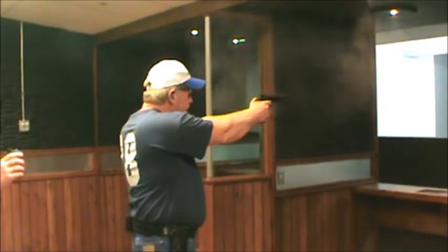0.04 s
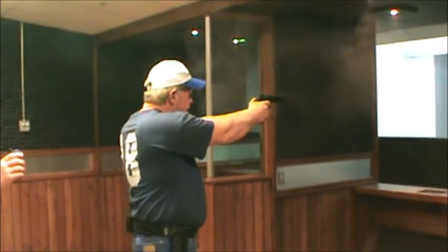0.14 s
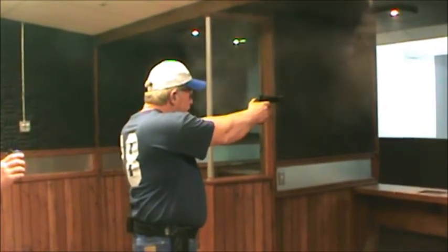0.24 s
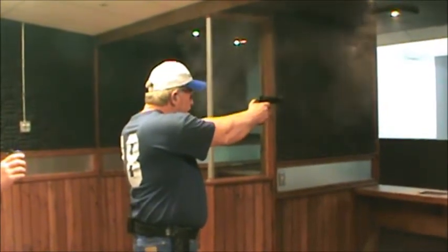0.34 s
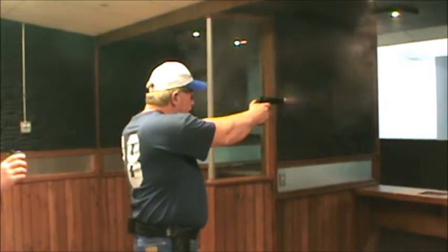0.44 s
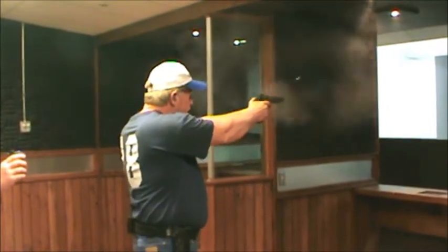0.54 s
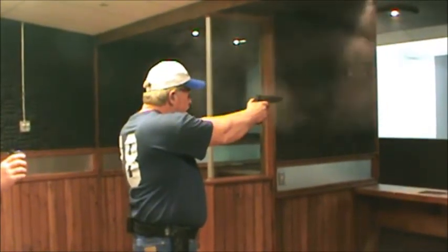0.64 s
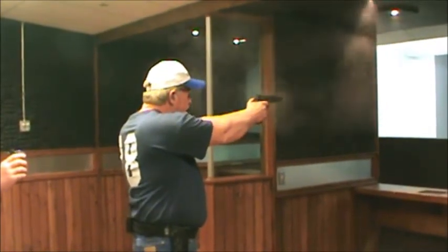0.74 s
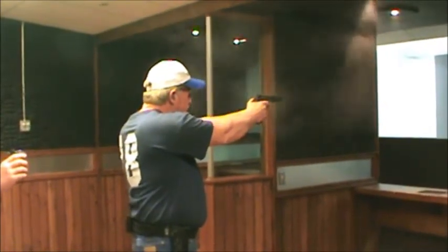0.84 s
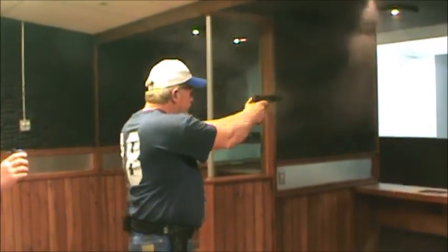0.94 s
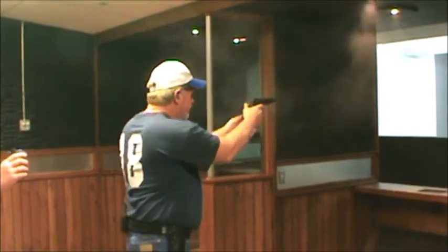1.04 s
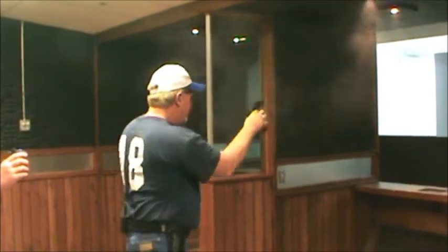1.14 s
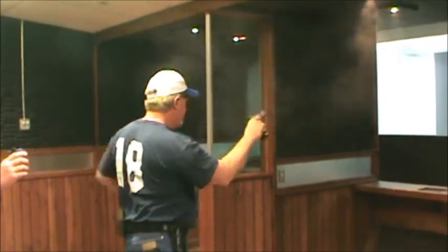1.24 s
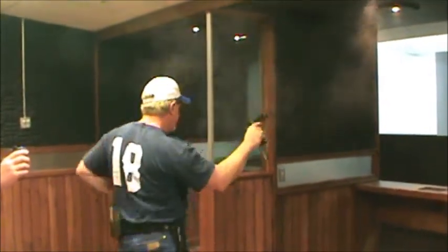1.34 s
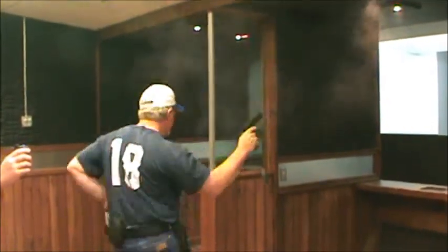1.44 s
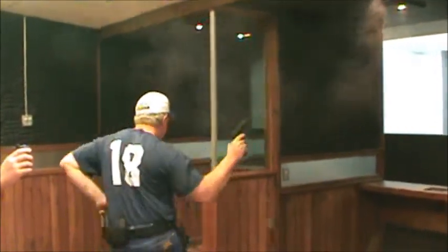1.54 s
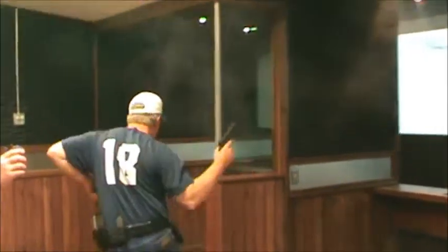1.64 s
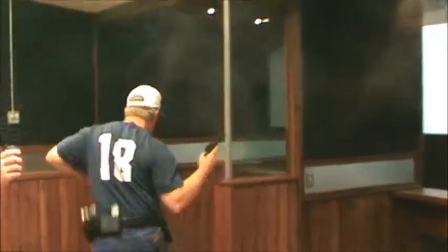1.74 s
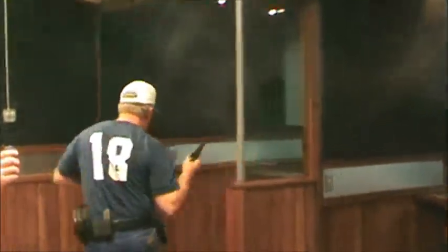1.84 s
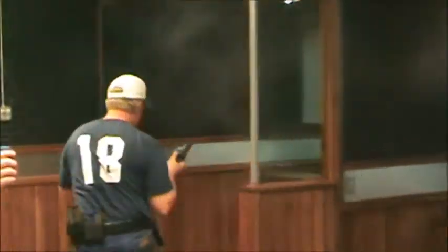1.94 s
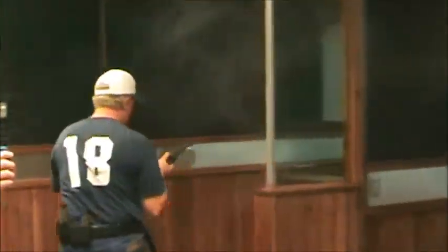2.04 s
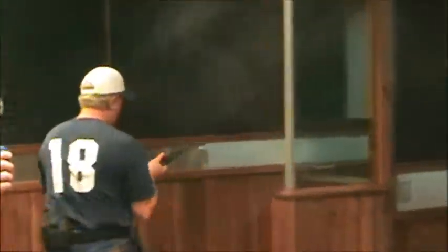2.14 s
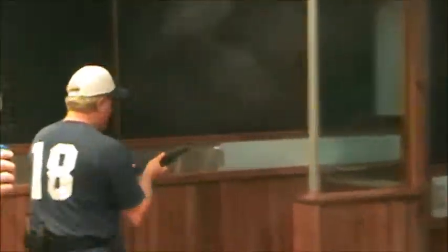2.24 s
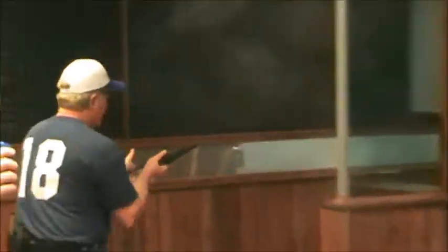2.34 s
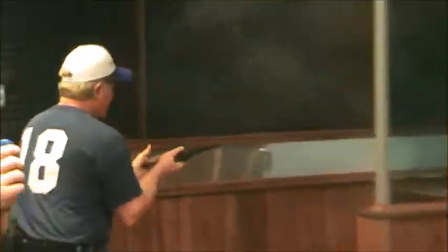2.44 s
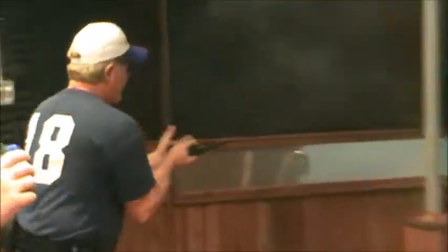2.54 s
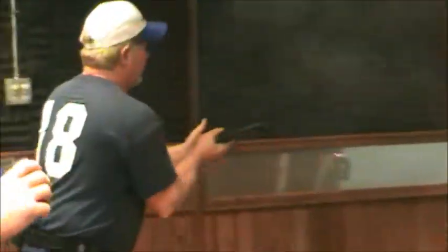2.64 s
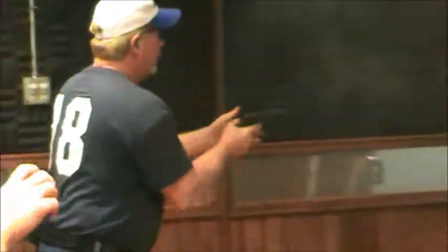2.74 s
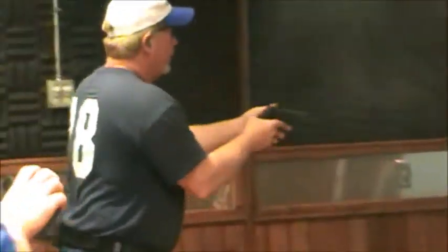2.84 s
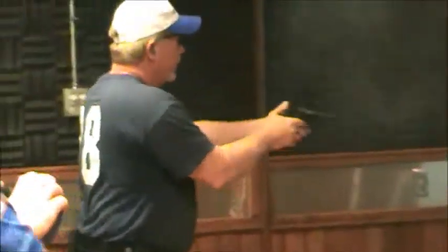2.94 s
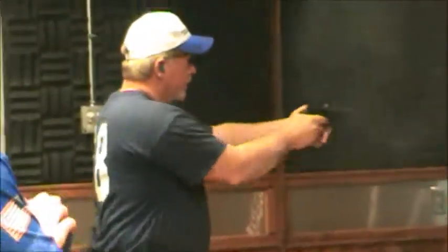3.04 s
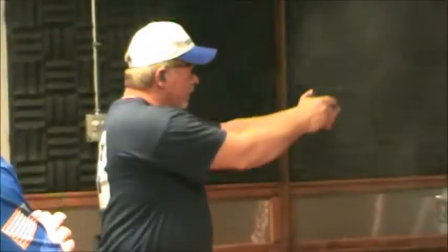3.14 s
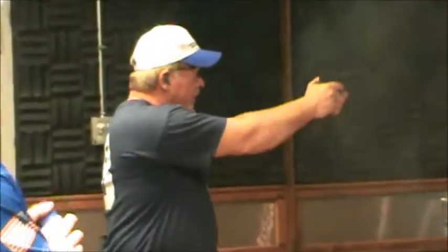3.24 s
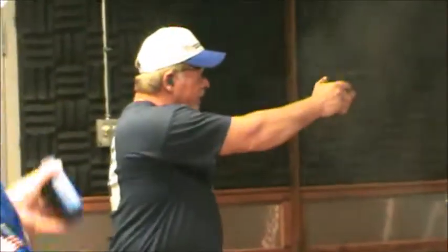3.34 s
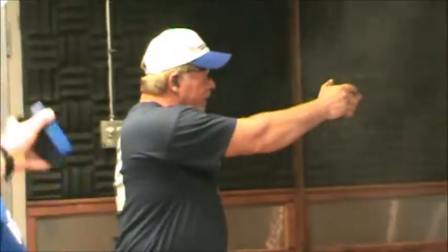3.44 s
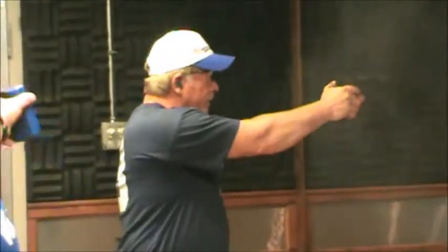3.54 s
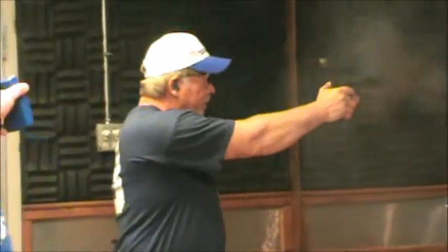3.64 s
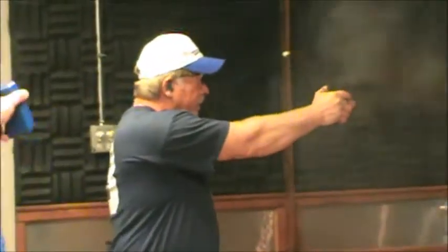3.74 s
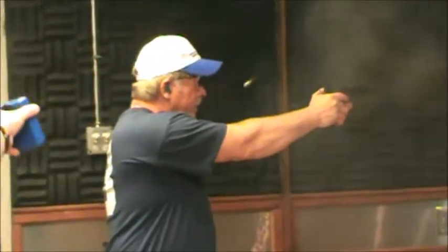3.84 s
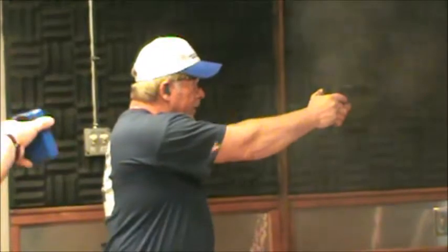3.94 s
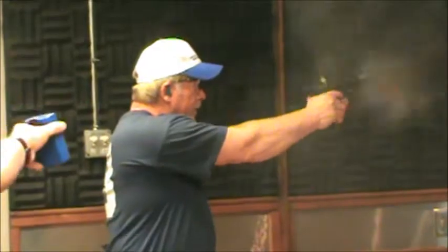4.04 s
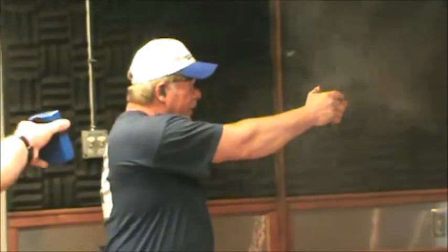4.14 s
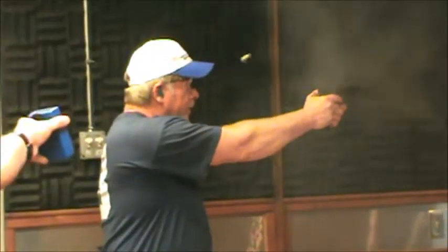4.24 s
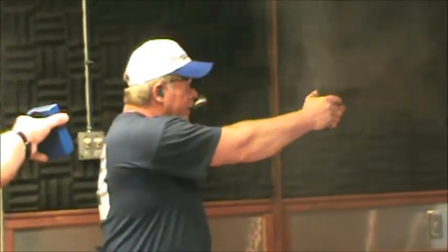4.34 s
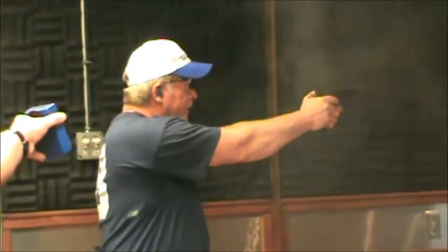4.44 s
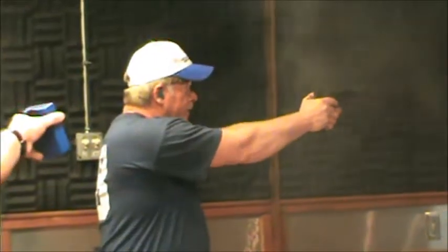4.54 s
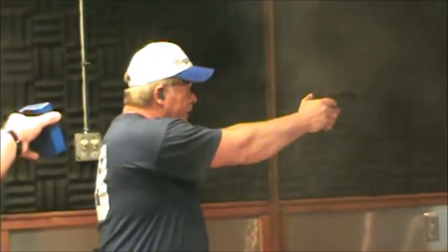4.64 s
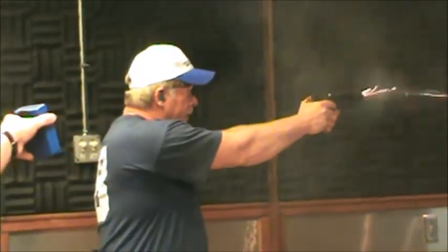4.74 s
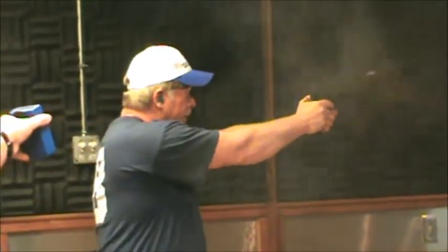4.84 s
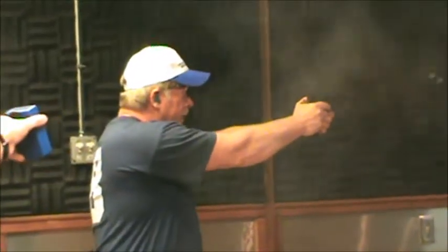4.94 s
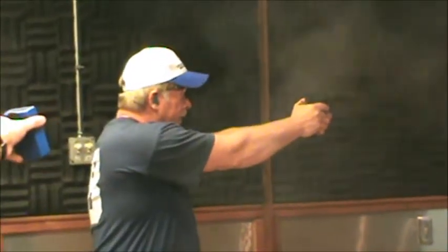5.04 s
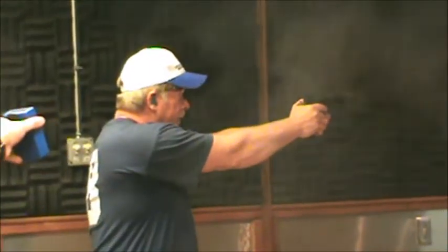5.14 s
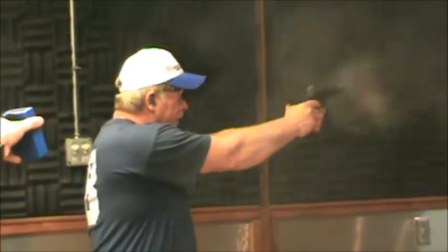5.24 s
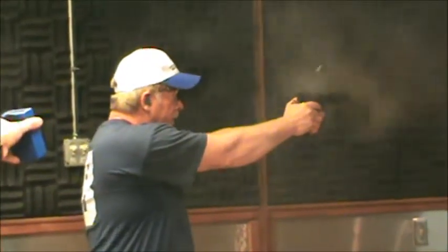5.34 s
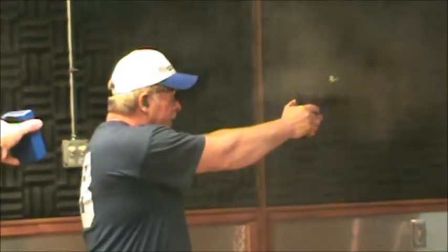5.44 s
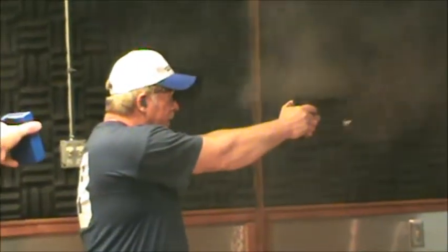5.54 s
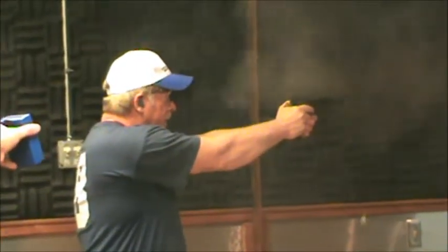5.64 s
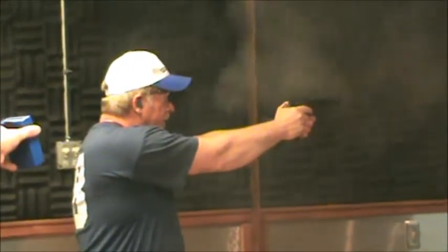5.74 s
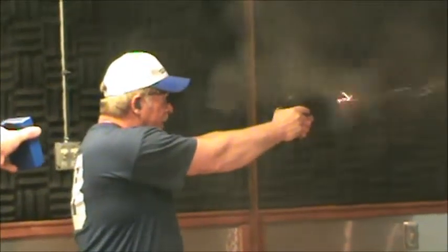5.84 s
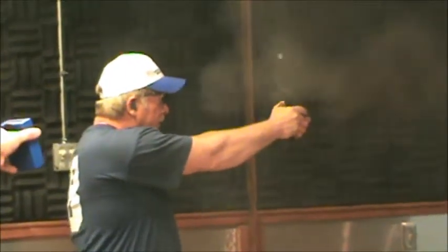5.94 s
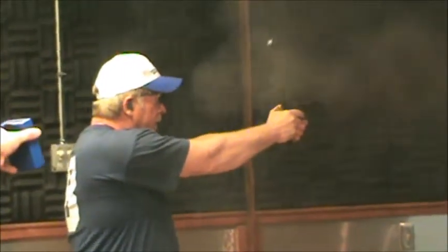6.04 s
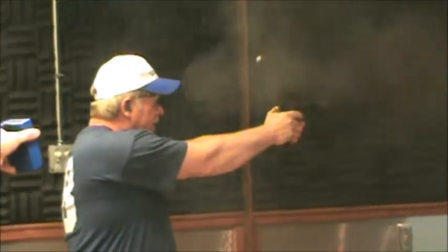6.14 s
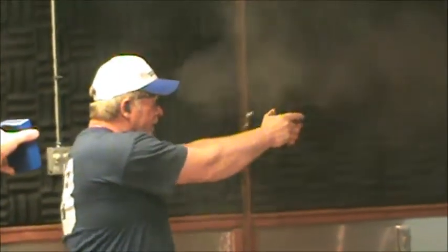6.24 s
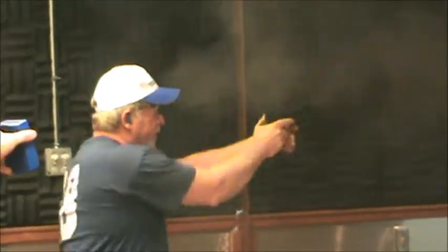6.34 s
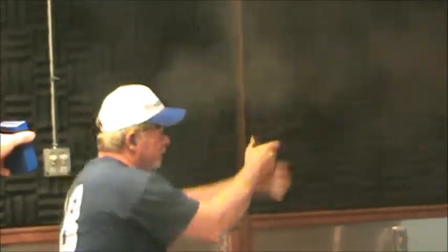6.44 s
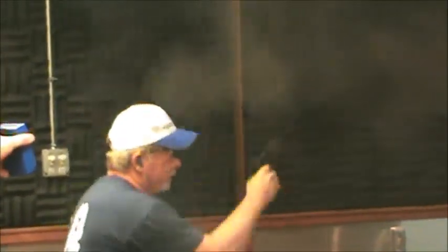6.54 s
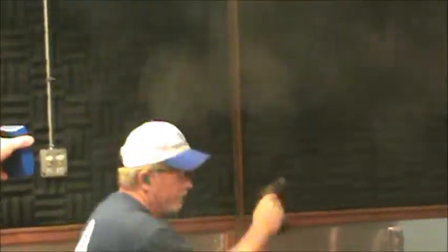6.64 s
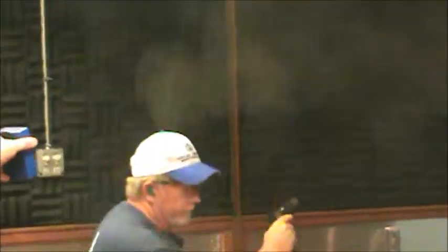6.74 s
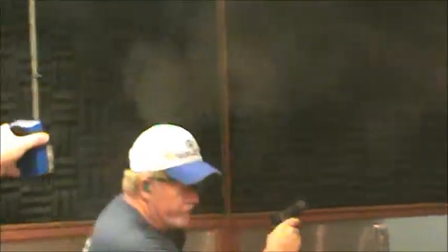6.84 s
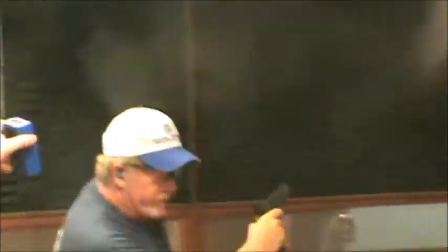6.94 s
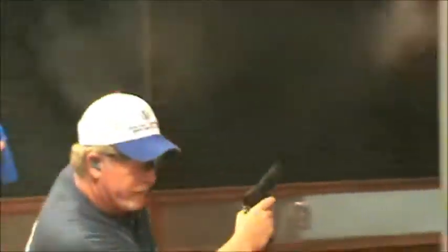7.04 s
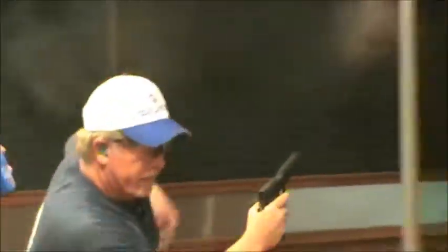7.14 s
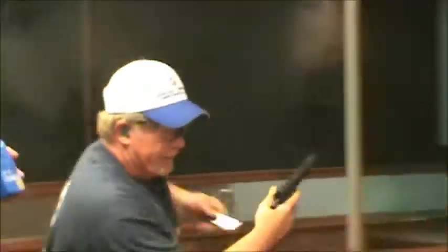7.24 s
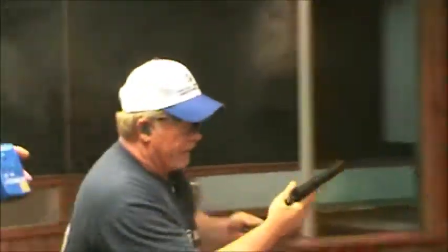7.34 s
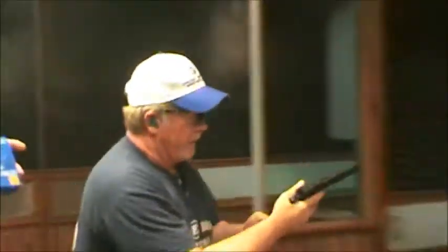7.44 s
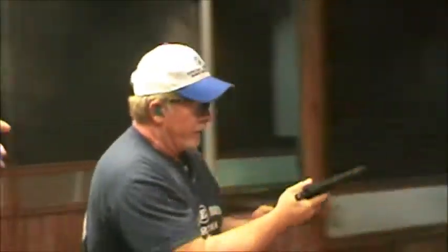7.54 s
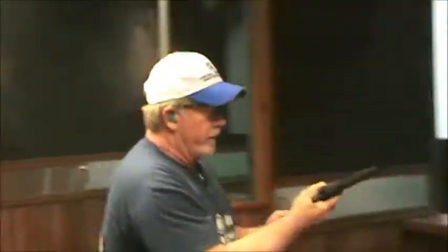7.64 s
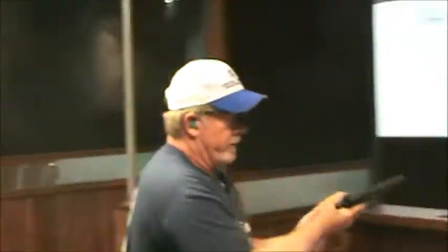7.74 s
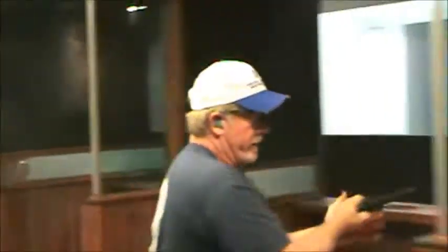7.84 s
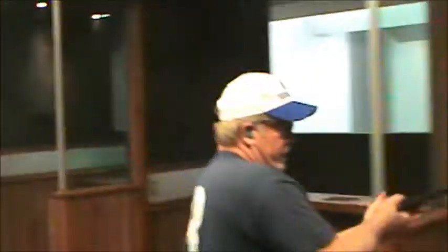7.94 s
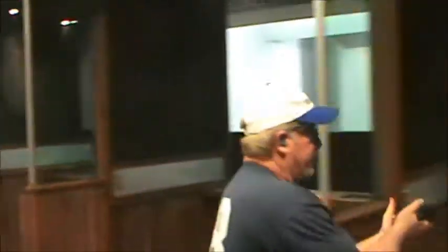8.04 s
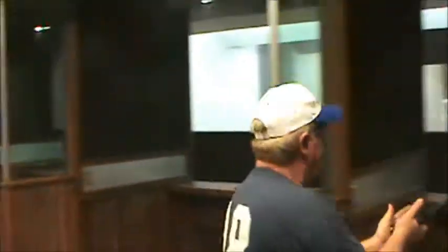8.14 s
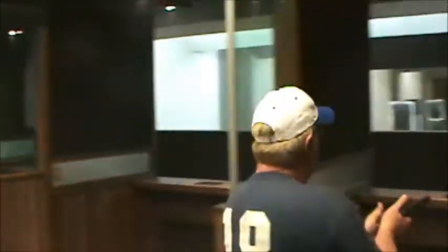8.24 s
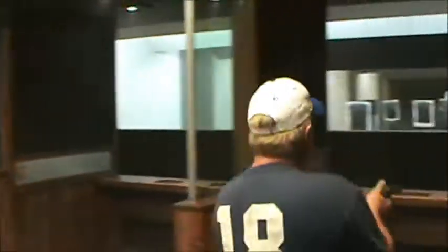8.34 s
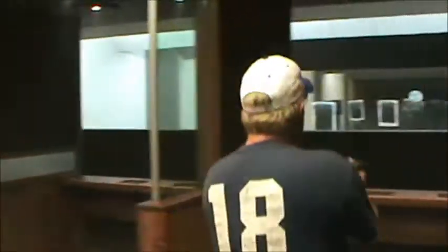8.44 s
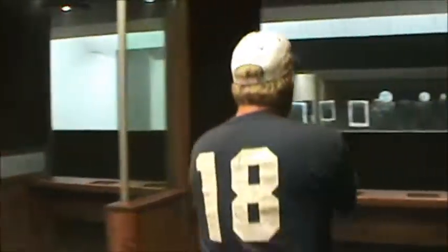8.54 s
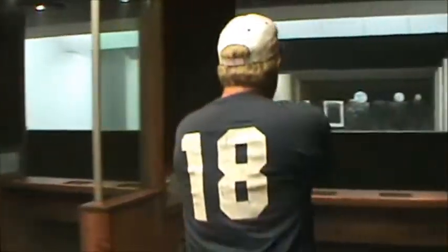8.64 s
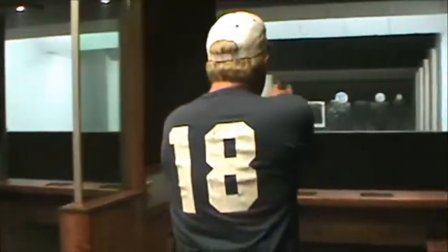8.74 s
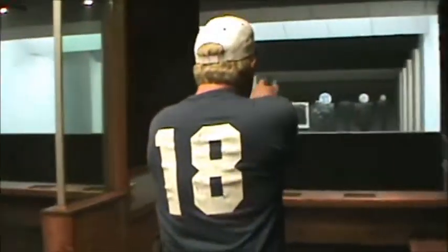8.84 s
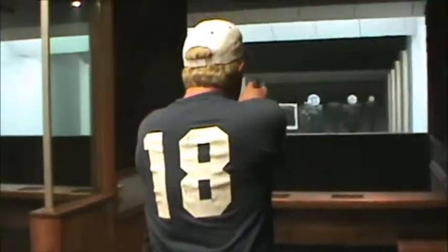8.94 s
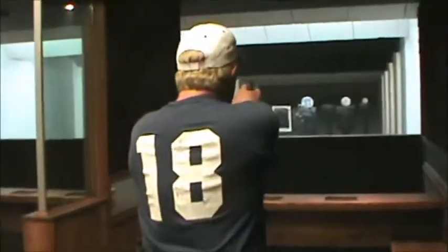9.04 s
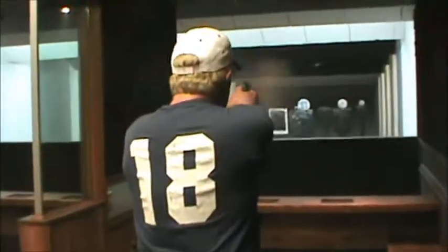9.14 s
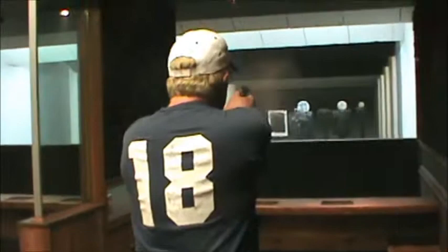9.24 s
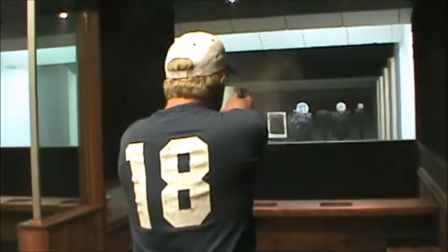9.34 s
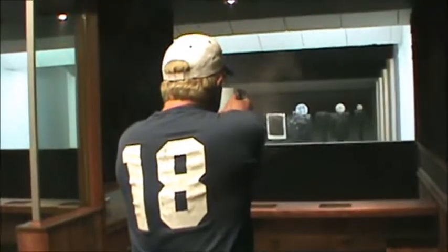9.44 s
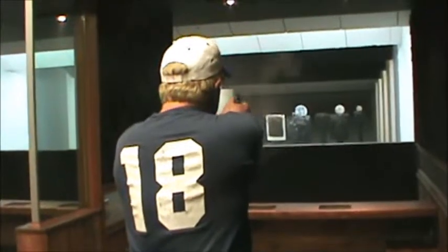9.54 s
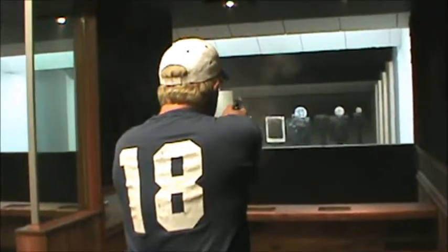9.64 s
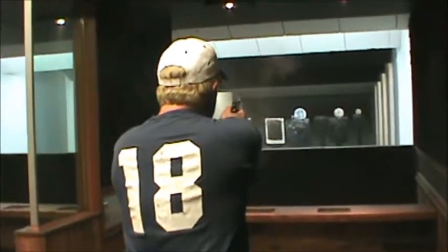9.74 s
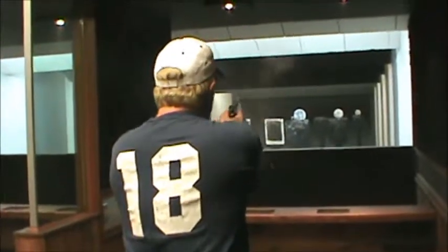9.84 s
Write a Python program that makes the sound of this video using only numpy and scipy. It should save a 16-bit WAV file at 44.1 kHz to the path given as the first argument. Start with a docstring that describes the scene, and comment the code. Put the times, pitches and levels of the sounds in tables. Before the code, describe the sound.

In a boomy indoor range with a long echoing hall, steady ventilation hiss and a faint whine sit over deep rumble that swells as the microphone moves. A previous shot's tail and plate ring fade at the start; small brass tinkles at 0.3. A loud, clipped pistol blast at 0.5 leaves a bright, fluttering steel ring. A hollow magazine clatters near 1.8, with smaller bounces, scrapes and soft steps to 2.6, and a sharp metallic click at 2.5. A hard clack and hollow wooden bang come at 3.2. Five shots follow at 3.6, 4.05, 4.8, 5.25 and 5.9, each with a hissing splash and differently pitched plate clang, gain ducking each time. Rings decay through case tinkles; a magazine drops with a softer wood knock at 7.2, reload clacks until 8. A last shot at 9.1 booms and splashes without ringing, followed by a click at 9.5 and clack at 9.8.

```python
"""Pistol and steel plates in an indoor range

Filtered-noise blasts excite a boomy booth and a long hall; plates downrange ring as fluttering modes.
A magazine clatters, the gun is reloaded, spent cases tinkle and a wooden partition bangs twice.
Steady ventilation air hisses over a deep noise rumble that swells as the microphone is moved and handled.
Loud sounds overload the microphone and pull its gain down."""
import sys
import numpy as np
from scipy import signal
from scipy.fft import rfft, irfft, next_fast_len
from scipy.io import wavfile
from scipy.ndimage import uniform_filter1d, minimum_filter1d

SR = 44100
rng = np.random.default_rng(int(sys.argv[2]) if len(sys.argv) > 2 else 0)


def wav_record(signal):
    """Record a signal, one row per channel, as 16-bit PCM in the file named by sys.argv[1]."""
    frames = np.transpose(np.atleast_2d(signal))
    bounded = np.clip(frames, -1, 1)
    # unit amplitude maps onto the largest positive 16-bit level
    quanta = np.round(bounded * 32767).astype(np.int16)
    wavfile.write(sys.argv[1], SR, quanta)


N = 436570
TIME = np.arange(2 * SR) / SR  # time axis of one event, s

# low thud of a hard contact: pitch_hz, level_db per Hz
KNOCK = [(40, -17), (200, -7), (450, 1), (850, -0.5), (1800, -29.5), (16000, -48.5)]
# modes of each steel plate: pitch_hz, level_db
PLATE_A = [(2478, -23), (2950, -32.5), (3082, -35), (4570, -41), (4947, -38), (8093, -36)]
PLATE_B = [(1600, -34), (2301, -28), (3115, -24.5), (3250, -32), (4630, -30), (7200, -33), (7610, -26.5),
           (8200, -31)]
PLATE_C = [(1701, -19), (1801, -21.5), (2041, -15), (2450, -23), (2888, -22), (3568, -18.5), (4081, -23.5),
           (4181, -24.5), (4245, -16), (4439, -19.5), (5281, -27), (5706, -30), (5781, -22.5),
           (6007, -25.5), (6528, -23), (7515, -24.5), (8753, -29)]
PLATE_D = [(2497, -21), (2910, -26), (4680, -17.5), (7655, -19.5), (8280, -23.5)]
PLATE_E = [(1686, -17), (1792, -21.5), (2030, -15.5), (2364, -25), (3004, -22.5), (4059, -18),
           (4155, -20.5), (4421, -17), (4727, -26), (6078, -30), (6980, -26.5), (7432, -25), (7792, -30)]
PLATE_F = [(3010, -16.5), (4860, -35), (5040, -33.5), (7110, -29.5), (7525, -29.5), (8060, -44)]
PLATE_G = [(2405, -18.5), (4606, -23.5), (8080, -34)]
# plate mounting: Doppler spread (share of pitch), time until damped (s), strength of the reflections
HANGING, TOPPLING = (0.016, 3.1, 2.02), (0.012, 0.79, 0.88)


def amp(db):
    """Decibels to gain."""
    return 10 ** (np.asarray(db) / 20)


def unit(x):
    """Scale to rms 1."""
    return x / np.sqrt(np.mean(x ** 2) + 1e-20)


def along(points, hz):
    """Read (Hz, value) points on a log frequency axis."""
    f, v = np.transpose(points)
    return np.interp(np.log(hz + 1), np.log(f), v)


def fade(t60, t=TIME):
    """Exponential decay by 60 dB in t60 seconds."""
    return np.exp(-np.log(1000) * t / np.maximum(t60, 1e-3))


def swell(rise):
    """Onset with a time constant in seconds."""
    return 1 - np.exp(-TIME / max(rise, 1e-5))


def add(track, s, sound):
    """Mix a sound into the track at a time in seconds, cutting what lies outside."""
    start = round(s * SR)
    a, b = max(start, 0), min(start + sound.shape[1], N)
    if b > a:
        track[:, a:b] += sound[:, a - start:b - start]


def noise(spectrum, side_db, size=len(TIME)):
    """Coloured stereo noise of rms 1; side_db sets its width."""
    m = next_fast_len(size)
    colour = amp(along(spectrum, np.fft.rfftfreq(m, 1 / SR)))
    white = rng.standard_normal((2, m))
    mid, side = irfft(rfft(white) * colour, m)[:, :size]
    side = amp(side_db) * side
    return unit(np.array([mid + side, mid - side]))


def dying(x, t60s):
    """Let each frequency die at its own speed."""
    hz, t, z = signal.stft(x, SR, nperseg=256)
    decay = fade(along(t60s, hz)[:, None], t)
    return signal.istft(z * decay, SR, nperseg=256)[1][:, :x.shape[1]]


def ring(hz, t60, width_hz, scatter):
    """One mode: a clean direct tone at first, fluttering ever more as wall reflections gather around it."""
    gather_beats = 3.8  # time constant of the gathering, in flutters
    wall_side_db, flutter_knee = -1.5, 0.64  # width of the reflections; softness of the peak levelling
    t = TIME[:int(min(t60 * 1.2, 2) * SR)]
    # slow complex noise: one strand common to both ears, one opposed between them
    knots = rng.standard_normal((2, 1024, 2)) @ [1, 1j]
    shared, apart = (np.interp(t * width_hz, np.arange(len(k)), k) for k in knots)
    wet = scatter * (1 - np.exp(-t * width_hz / gather_beats))
    reflections = shared + amp(wall_side_db) * np.array([apart, -apart])
    field = (1 + wet * reflections) / np.sqrt(1 + 2 * wet ** 2)
    tone = np.real(field * np.exp(2j * np.pi * (hz * t + rng.random())))
    tone = tone / np.sqrt(np.abs(field) + flutter_knee)  # evens out the flutter's peaks
    decay = fade(t60, t)
    return unit(tone * decay) * np.sqrt(np.mean(decay ** 2))


def gunfire():
    """A sharp blast fills the booth, its panels build up a boom, the long hall answers and echoes."""
    # shots: start_s, blast level_db, room drive_db, boom t60_s, far-wall slap level_db
    shots = [(-.22, -16.5, -10, 0.23, -39), (.471, 12.5, 1, 0.32, -14), (3.6, 13.5, 3, 0.24, -13.5),
             (4.046, 10, 0, 0.37, -10.5), (4.773, 12.5, 1, 0.3, -16), (5.241, 13, -1, 0.34, -18),
             (5.865, 11.5, -3, 0.37, -11), (9.084, 12.5, 4, 0.37, -10)]
    # spectra of the blast, the booth's boom, the hall's tail and the echo: pitch_hz, level_db per Hz
    blast_spectrum = [(30, -22), (100, -11), (250, -1), (600, 2), (1200, 3), (2500, -2.5), (5000, -6.5),
                      (10000, -6.5), (16000, -15)]
    boom_spectrum = [(30, -34.5), (100, -36.5), (145, -7.5), (220, -3.5), (298, -4.5), (350, -5.5),
                     (470, 1), (575, 4.5), (650, -8.5), (760, -0.5), (1500, -12), (16000, -27.5)]
    hall_spectrum = [(30, -18), (100, -6), (180, 4.5), (450, 5), (700, 1), (1050, 3.5), (2000, 0),
                     (3200, -3), (6000, -18), (10000, -1), (16000, -8.5)]
    echo_spectrum = [(100, -22.5), (400, 5.5), (1400, 2.5), (3200, -2), (6000, -14), (16000, -38.5)]
    # decay of booth and hall: pitch_hz, t60_s
    booth_t60s = [(100, 0.37), (600, 0.23), (3000, 0.24), (16000, 0.17)]
    hall_t60s = [(100, 0.87), (500, 1.283), (2500, 1.447), (6000, 1.88), (10000, 0.31), (16000, 0.41)]
    boom_db, hall_db, echo_db = 8, -11.5, -16.5  # over the room drive
    echo_delay_s, slap_t60_s, echo_rise_s, echo_t60_s = 0.164, 0.29, 0.2, 0.76
    out = np.zeros((2, N))
    for s, blast_db, room_db, boom_t60, slap_db in shots:
        blast = dying(noise(blast_spectrum, side_db=-6.0), booth_t60s) * swell(0.014)
        boom = noise(boom_spectrum, side_db=-6.5) * swell(0.016) ** 2 * fade(boom_t60)
        hall = dying(noise(hall_spectrum, side_db=-12.5), hall_t60s) * swell(0.024)
        room = amp(boom_db) * boom + amp(hall_db) * hall
        add(out, s, amp(blast_db) * blast + amp(room_db) * room)
        # the far wall's slap, with reflections from downrange swelling behind it
        slap = amp(slap_db) * fade(slap_t60_s)
        downrange = amp(room_db + echo_db) * swell(echo_rise_s) * fade(echo_t60_s)
        add(out, s + echo_delay_s, noise(echo_spectrum, side_db=-5.0) * (slap + downrange))
    return out


def targets():
    """Bullets splash; Doppler shift spreads moving plates' modes, high ones speak and die sooner."""
    # hits: start_s, splash level_db, ring level_db, ring t60_s and build-up_s at 3 kHz, mounting, modes
    # (the last target does not ring)
    hits = [(-.1, -30, 0, 1.65, 0.015, HANGING, PLATE_A), (.56, -12, 1.5, 1.65, 0.02, HANGING, PLATE_B),
            (3.648, -9, -3, 1.81, 0.01, TOPPLING, PLATE_C),
            (4.088, -14.5, -1.5, 1.2, 0.011, HANGING, PLATE_D),
            (4.895, -12.5, -3.5, 2.2, 0.063, TOPPLING, PLATE_E),
            (5.365, -12.5, 5.5, 1.41, 0.046, HANGING, PLATE_F),
            (5.922, -15.5, 3.5, 1.34, 0.013, HANGING, PLATE_G), (9.272, -13, 0, 1, 1, TOPPLING, [])]
    # bullet splash: pitch_hz, level_db per Hz
    splash_spectrum = [(100, -39.5), (500, -29), (1200, -3), (3000, 5), (6000, 0), (11000, -1.5),
                       (16000, -19)]
    # splash decay: pitch_hz, t60_s
    splash_t60s = [(2500, 1), (14000, 0.46)]
    plate_pan_db = -3  # left minus right
    strike_flash, flash_t60_s = 0.86, 0.67  # extra loudness of a fresh strike, in proportion to pitch
    shimmer_db = -18  # each top mode against the splash
    out = np.zeros((2, N))
    sides = amp([[plate_pan_db / 2], [-plate_pan_db / 2]])
    for s, splash_db, ring_db, t60, bloom_s, (spread, damped_s, scatter), modes in hits:
        splash = dying(noise(splash_spectrum, side_db=-3.0), splash_t60s)
        add(out, s, amp(splash_db) * splash * (1 + 0.27 * fade(0.19)))
        damping = np.exp(-(TIME / damped_s) ** 4)  # a toppled plate soon falls silent
        for hz, mode_db in modes:
            height = hz / 3000
            tone = ring(hz, t60 * height ** -.3, width_hz=spread * hz, scatter=scatter)
            onset = swell(bloom_s / np.sqrt(height)) ** 2
            flash = 1 + strike_flash * height * fade(flash_t60_s)
            envelope = onset * flash * damping
            add(out, s, amp(ring_db + mode_db) * sides * tone * envelope[:tone.shape[1]])
        if modes:
            add(out, s, amp(splash_db + shimmer_db) * sides * shimmer(spread, bloom_s))
    return out


def shimmer(spread, bloom_s):
    """A plate's crowded top modes blend into a short metallic wash."""
    pitches_hz = rng.uniform(7740, 13050, size=20)
    wash = sum(ring(hz, 0.75, width_hz=spread * hz, scatter=1.8) for hz in pitches_hz)
    return wash * swell(bloom_s)[:wash.shape[1]]


def partition():
    """A hard strike on the wood, then a hollow bang that lingers in the hall."""
    # bangs: start_s, panel level_db, strike level_db
    bangs = [(3.241, -20.5, -13), (7.192, -26, -21)]
    # hollow wooden panel: pitch_hz, level_db per Hz
    panel_spectrum = [(60, -15), (170, -7.5), (400, 2.5), (650, -4.5), (1500, -9), (5000, -18),
                      (16000, -34)]
    strike_mix_db = (0, -1.5, -3)  # knock, clack, tick
    panel_t60_s, strike_t60_s = 1.54, 0.37
    out = np.zeros((2, N))
    for s, panel_db, strike_db in bangs:
        add(out, s, amp(strike_db) * blow(strike_mix_db, strike_t60_s))
        panel = noise(panel_spectrum, side_db=-11.5) * swell(0.0018) * fade(panel_t60_s)
        add(out, s, amp(panel_db) * panel)
    return out


def handling():
    """One hollow magazine bounces, another slides home, and parts of the gun click and clack."""
    # bounces and knocks of a hollow magazine: start_s, rattle level_db, ring level_db
    bounces = [(1.761, -14.5, -40), (1.779, -11.5, -26), (2.018, -25.5, -35), (2.182, -30, -29),
               (2.262, -44, -42), (2.329, -31, -33.5), (7.183, -12.5, -27), (7.207, -14.5, -25),
               (9.833, -36, -24.5)]
    # dry scrapes and snaps of a magazine, on the floor or sliding home: start_s, level_db, rise_s
    scrapes = [(2.09, -26.5, 0.012), (2.376, -31.5, 0.0057), (2.425, -31.5, .008), (2.486, -27, .02),
               (7.708, -20, 0.014), (7.729, -27, .002), (7.839, -33.5, .001), (7.857, -17.5, .0005)]
    # sharp clicks of small steel and brass parts: start_s, level_db
    clicks = [(0.3055, -22.5), (1.267, -22.5), (2.514, -8.5), (2.7262, -23.5), (2.755, -23.5), (3.524, -18),
              (6.6714, -20.5), (7.505, -28), (7.5242, -23), (9.538, -12)]
    # duller clacks of gun and gear: start_s, level_db
    clacks = [(1.507, -24.5), (3.235, -6), (6.464, -28), (6.612, -33.5), (7.362, -11), (7.992, -15.5),
              (9.833, -17.5)]
    # magazine rattle: pitch_hz, level_db per Hz
    rattle_spectrum = [(150, -48), (1200, -15), (2300, 4), (5200, -2.5), (8000, 2.5), (13000, 0),
                       (16000, -12)]
    # modes of the magazine's hollow body: pitch_hz, level_db
    shell_modes = [(1620, -10), (1960, -2), (2360, -10), (2650, -12), (2950, -11), (7150, -14), (8200, -12)]
    rattle_t60_s, shell_t60_s, scrape_t60_s, click_t60_s, clack_t60_s = 0.16, 0.21, 0.12, 0.17, 0.19
    shell_vary_db = 4  # each blow favours other modes
    click_mix_db, clack_mix_db = (-34, -52, -12.5), (-18.5, -6.5, -21)  # knock, clack, tick
    out = np.zeros((2, N))
    for s, db, ring_db in bounces:
        add(out, s, amp(db) * contact(rattle_spectrum, rattle_t60_s, snap_db=-15))
        for hz, mode_db in shell_modes:
            level_db = ring_db + mode_db + rng.normal(0, shell_vary_db)
            add(out, s, amp(level_db) * ring(hz, shell_t60_s, width_hz=320, scatter=2))
    for s, db, rise in scrapes:
        scrape = contact(rattle_spectrum, scrape_t60_s, snap_db=-5)
        add(out, s, amp(db) * scrape * swell(rise)[:scrape.shape[1]])
    for s, db in clicks:
        add(out, s, amp(db) * blow(click_mix_db, click_t60_s))
    for s, db in clacks:
        add(out, s, amp(db) * blow(clack_mix_db, clack_t60_s))
    return out


def blow(mix_db, t60):
    """A hard contact: a low knock, a mid clack and a high tick together."""
    # mid clack and high tick: pitch_hz, level_db per Hz
    clack_spectrum = [(100, -29), (600, -6.5), (1300, 4), (3200, -3), (6000, -16.5), (16000, -42)]
    tick_spectrum = [(200, -38.5), (1500, -1), (4000, 1.5), (8000, 4.5), (12000, 1), (16000, -15.5)]
    bands = zip(mix_db, (KNOCK, clack_spectrum, tick_spectrum))
    return sum(amp(db) * contact(spectrum, t60, snap_db=-8) for db, spectrum in bands)


def contact(spectrum, t60, snap_db):
    """A short snap of noise followed by its reflections in the booth."""
    t = TIME[:SR // 2]
    near = amp(-10) * fade(0.016, t)  # the nearest walls answer first
    booth = amp(-2.5) * fade(t60, t)
    tail = amp(-27.5) * fade(0.48, t)
    reflections = (near + booth + tail) * swell(0.00072)[:len(t)]
    snap = amp(snap_db) * fade(0.0018, t)
    return noise(spectrum, side_db=-8, size=len(t)) * (reflections + snap)


def brass():
    """Ejected cases and small metal parts ring in two modes."""
    # tinkles: start_s, lower pitch_hz, upper pitch_hz, level_db, t60_s
    cases = [(0.298, 7260, 11700, -48, 1.5), (1.238, 7520, 11330, -48, 1.7),
             (2.513, 8170, 10640, -39.5, 0.49), (6.472, 7380, 11500, -54, 3),
             (6.92, 7240, 11950, -52.5, 2.7), (7.119, 7500, 11470, -47.5, 1.6),
             (7.589, 7600, 11380, -47, 1.1), (9.835, 7360, 11360, -55, 0.56)]
    upper_db = -9  # second mode against the first
    out = np.zeros((2, N))
    for s, lower_hz, upper_hz, db, t60 in cases:
        for hz, mode_db in (lower_hz, 0), (upper_hz, upper_db):
            add(out, s, amp(db + mode_db) * ring(hz, t60, width_hz=160, scatter=1.3))
    return out


def footsteps():
    """Shoes knock softly on the floor as the shooter changes position: low noise contacts."""
    # steps: start_s, level_db before the trim
    steps = [(2.393, -37.5), (2.61, -35), (8.262, -37)]
    trim_db, step_t60_s = -6.5, 0.36
    out = np.zeros((2, N))
    for s, db in steps:
        add(out, s, amp(db + trim_db) * contact(KNOCK, step_t60_s, snap_db=-16.5))
    return out


def air_and_rumble():
    """Steady extractor air with a faint whine; below it, noise swells as the microphone is moved."""
    # background noise, deep rumble and air together: pitch_hz, level_db per Hz
    background_spectrum = [(22, -9.5), (42, 1), (65, -6), (120, -18), (175, -10.5), (260, -18.5),
                           (700, -20), (2300, -25), (6000, -37), (16000, -43.5)]
    # deep rumble: time_s, level_db before the trim
    rumble_points = [(0.0, -58.5), (0.55, -49.5), (1.21, -58), (2.42, -47), (3.06, -48), (3.5, -42.5),
                     (3.61, -51), (6.86, -57.5), (7.72, -46.5), (9.9, -46)]
    split_hz, rumble_trim_db, air_db = 95.5, 6, -47.5  # rumble below the split, steady air above
    t = np.arange(N) / SR
    background = noise(background_spectrum, side_db=-19, size=N)
    low_pass = signal.butter(4, split_hz, "low", fs=SR, output="sos")
    high_pass = signal.butter(4, split_hz, "high", fs=SR, output="sos")
    rumble = signal.sosfilt(low_pass, background)
    air = signal.sosfilt(high_pass, background)
    whine = noise([(3860, -60), (4060, 3), (4260, -61)], side_db=1.0, size=N)
    rumble_db = np.interp(t, *np.transpose(rumble_points)) + rumble_trim_db
    return amp(rumble_db) * rumble + amp(air_db) * (air + amp(-15.5) * whine)


def scene():
    """Everything heard at the microphone."""
    return gunfire() + targets() + partition() + handling() + brass() + footsteps() + air_and_rumble()


def saturate(x, top_db):
    """Soft clipping at a ceiling."""
    return x / (1 + (x / amp(top_db)) ** 4) ** (1 / 4)


def gain_control(x, limit_db, hold, release_db):
    """The gain drops at once above the limit, holds (s), then recovers by release_db a second."""
    power = np.abs(uniform_filter1d(np.mean(x ** 2, axis=0), SR // 250))
    need = np.minimum(limit_db - 10 * np.log10(power + 1e-12), 0)
    half = int(hold * SR / 2)
    held = minimum_filter1d(need, 2 * half + 1, origin=half)  # looks back only
    ramp = release_db * np.arange(N) / SR
    gain_db = np.minimum.accumulate(held - ramp) + ramp
    return x * amp(gain_db)


def record(dry):
    """The microphone overloads, the gain ducks, and the band ends steeply."""
    lag_hz, top_hz = 1965, 16000  # corner of the phase lag, end of the band
    x = saturate(dry, top_db=4.5)
    # the preamplifier's phase lag turns flattened crests back into ragged peaks
    pole = np.exp(-2 * np.pi * lag_hz / SR)
    x = signal.lfilter([-pole, 1], [1, -pole], x)
    x = gain_control(x, limit_db=-6.0, hold=0.074, release_db=43.5)
    x = saturate(x, top_db=0)
    band_limit = signal.ellip(10, .1, 70, top_hz, fs=SR, output="sos")
    return signal.sosfilt(band_limit, x)


dry = scene()
out = record(dry)
wav_record(out)
```